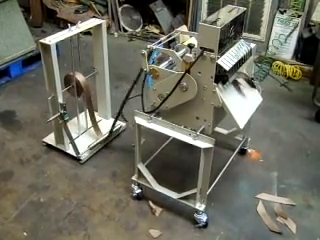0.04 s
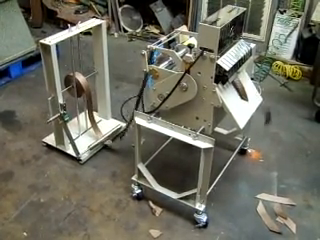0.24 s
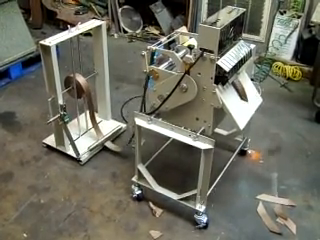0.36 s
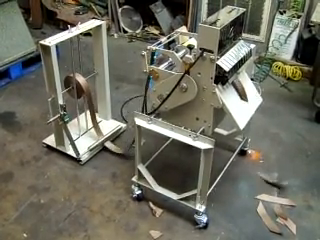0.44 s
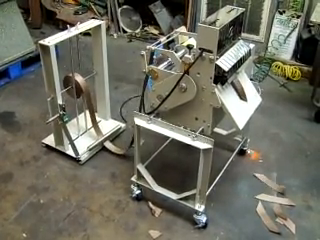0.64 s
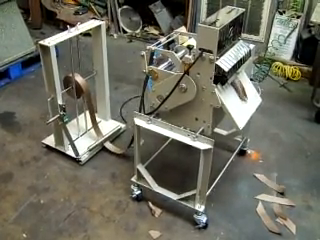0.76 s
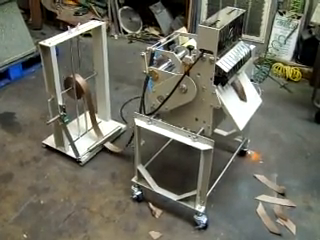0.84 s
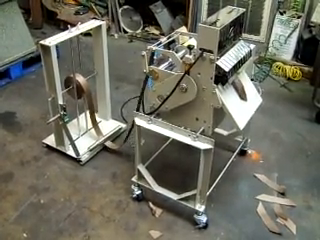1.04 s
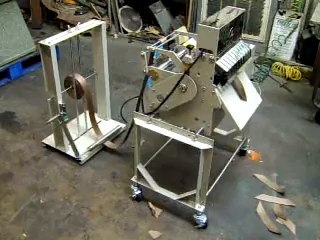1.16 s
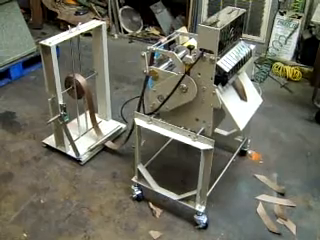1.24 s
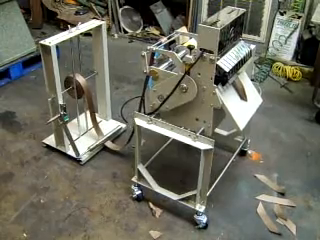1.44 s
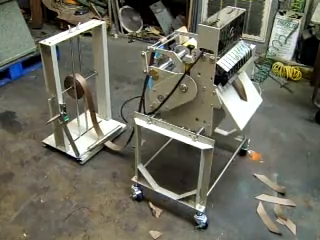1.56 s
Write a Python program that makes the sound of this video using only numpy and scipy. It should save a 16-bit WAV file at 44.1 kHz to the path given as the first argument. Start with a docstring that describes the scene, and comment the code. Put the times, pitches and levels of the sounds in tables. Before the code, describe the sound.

A cutting machine clacks sharply twice, with lighter metal knocks over a low motor hum.

```python
"""A strip cutter runs through one cycle in a workshop, heard on a single microphone.
A stepper motor whines and feeds the strip to its stop; the steel knife clacks down, rattles and rings,
and its carrier lifts with a clink. An air valve vents, the slide bangs back, and two lighter knocks
follow, with faint squeaks from dry bearings. The knife, slide and knocks leave a short tail in the room.
Motor hum and the thin whirr of running gear go on underneath."""
import sys
import numpy as np
from scipy import signal
from scipy.fft import rfft, irfft, next_fast_len
from scipy.io import wavfile
from scipy.ndimage import map_coordinates

SR = 44100
rng = np.random.default_rng(int(sys.argv[2]) if len(sys.argv) > 2 else 0)


def to_wav(sig):
    """Store sig (one row per channel, or 1-D mono) as 16-bit WAV at the path in sys.argv[1].

    Samples outside -1..1 are clipped; the rate is SR.
    """
    pcm = np.clip(np.atleast_2d(sig), -1, 1) * 32767
    pcm = np.round(pcm).astype(np.int16)
    wavfile.write(sys.argv[1], SR, pcm.T)  # frames by channels


N = 70560

# colour of the running gear and its loose parts: pitch_hz, level_db
GEAR_COLOUR = [(1500, -23.5), (2800, -13.5), (3300, -7), (3700, 1.5), (4050, -3.5), (4500, -13.5),
               (7000, -36)]


def amp(db):
    """Decibels to gain."""
    return 10 ** (np.asarray(db) / 20)


def clock():
    """Seconds at each sample."""
    return np.arange(N) / SR


def over_time(points):
    """(time_s, value) points read at each sample."""
    return np.interp(clock(), *np.transpose(points))


def over_pitch(points, hz):
    """(pitch_hz, value) points read on a log axis."""
    pitches, values = np.transpose(points)
    return np.interp(np.log(hz + 1), np.log(pitches + 1), values)


def fade(t, t60_s):
    """Exponential decay from t = 0."""
    return np.exp(-np.log(1000) * np.maximum(t, 0) / t60_s)


def rise(t, rise_s):
    """Soft onset at t = 0."""
    return 1 - np.exp(-np.maximum(t, 0) / rise_s)


def wobble(rate_hz):
    """A smooth random curve with rate_hz knots a second."""
    return map_coordinates(rng.standard_normal(1000), [clock() * rate_hz], mode="wrap")


def filtered(x, response):
    """x shaped by a gain that depends on frequency."""
    size = next_fast_len(N + SR // 2)
    return irfft(rfft(x, size) * response(np.fft.rfftfreq(size, 1 / SR)), size)[:N]


def noise(colour):
    """Coloured noise of rms 1."""
    x = filtered(rng.standard_normal(N), lambda hz: amp(over_pitch(colour, hz)))
    return x / np.sqrt(np.mean(x ** 2) + 1e-20)


def crowd(colour, ripple_db=4.5, spacing_hz=22.05):
    """A spectrum broken into the machine's many narrow resonances, each of random strength."""
    hz = np.arange(1, 1000) * spacing_hz
    return np.transpose([hz, over_pitch(colour, hz) + ripple_db * rng.standard_normal(len(hz))])


def tone(hz, db, drift_hz, flutter_db):
    """A sine wavering about the given pitch and rms level."""
    phase = 2 * np.pi * (np.cumsum(hz + drift_hz * wobble(24.99)) / SR + rng.random())
    return np.sqrt(2) * amp(db + flutter_db * wobble(21.95)) * np.sin(phase)


def in_room(x):
    """x dies away in the workshop, the treble first."""
    # reverberation: pitch_hz, t60_s
    room_decay = [(300, 0.93), (1200, 0.64), (3800, 0.57), (7000, 0.53), (14000, 0.32)]
    hz, t, spectra = signal.stft(x, SR, nperseg=256)
    decay = fade(t, over_pitch(room_decay, hz)[:, None])
    return signal.istft(spectra * decay, SR, nperseg=256)[1][:N]


def ring(hits, modes, attack_s, max_t60_s, blur):
    """Every blow adds energy to the decaying modes; reflections blur their level and phase."""
    t, out = clock(), np.zeros(N)
    for hz, db, t60_s in modes:
        energy = sum((amp(hit_db) * rise(t - s, attack_s) * fade(t - s, min(t60_s, max_t60_s))) ** 2
                     for s, hit_db in hits)
        scatter = 1 + blur * (wobble(46.97) + 1j * wobble(65.1))
        vibration = np.exp(2j * np.pi * (hz * t + rng.random()))
        out += amp(db) * np.sqrt(energy) * np.real(scatter * vibration)
    return out / np.sqrt(sum(amp(db) ** 2 for _, db, _ in modes) / 2)


def strike(hits, body, modes, attack_s, clack_t60_s, clack_db, room_db, ring_db,
           max_t60_s, blur, ripple_db):
    """Each blow gives a short clack of dense weak modes, a tail in the room and a ring of clear modes."""
    t, out = clock(), np.zeros(N)
    resonances = crowd(body, ripple_db)
    for start_s, db in hits:
        clack = amp(clack_db) * noise(body) * fade(t, clack_t60_s)
        tail = amp(room_db) * in_room(noise(resonances)) * rise(t, 0.009)
        blow = (clack + tail) * rise(t, attack_s)
        start = round(start_s * SR)
        out[start:] += amp(db) * blow[:N - start]
    return out + amp(ring_db) * ring(hits, modes, attack_s, max_t60_s, blur)


def workshop():
    """The bed of the place: motor hum, room tone and the uneven whirr and whistle of running gear."""
    # motor tones and the colour of the room tone: pitch_hz, level_db
    hum_tones = [(74, -68.5), (88, -70.5), (115, -64.5), (168, -73)]
    room_colour = [(25, -7), (42, -10.5), (85, -4), (130, -8), (230, -12), (600, -15), (1200, -11),
                   (1600, -7), (2300, -16), (3300, -5), (3900, -6), (5200, -14), (8800, -24), (15500, -30)]
    # swell of the running gear: time_s, level_db
    whirr_level = [(0, -50), (.5, -46.5), (1.05, -45), (1.3, -53), (1.55, -54), (1.6, -57)]
    whistle_level = [(0, -65), (1.1, -66), (1.3, -61), (1.6, -63)]
    hum = sum(tone(hz, db, drift_hz=4.17, flutter_db=2.5) for hz, db in hum_tones)
    whirr = noise(crowd(GEAR_COLOUR)) * amp(over_time(whirr_level) + 1.5 * wobble(59.6))
    whistle = tone(4680, over_time(whistle_level), drift_hz=1.6, flutter_db=1.5)
    return hum + amp(-55) * noise(room_colour) + whirr + whistle


def feed(step_hz=393.8, stop_s=0.207):
    """The stepper whines under load and the roller sings while the strip scrapes through."""
    # overtones of the step rate: multiple, level_db
    overtones = [(4, -42.5), (6, -59), (7, -63), (8, -58.5), (9, -57.5), (10, -54)]
    # the stepper's load as it pulls: time_s, gain_db
    load = [(0, -6.5), (.05, -3), (.1, 0.5), (.15, -4.5), (.2, -2)]
    # the roller's note: time_s, pitch_hz
    roller_pitch = [(0, 3990), (.07, 4005), (.12, 4055), (.18, 4070), (.22, 4020)]
    # colour of the scrape: pitch_hz, level_db
    scrape_colour = [(400, -22.5), (690, -7), (1050, -10), (1270, 1.5), (1850, -11), (2300, -8.5),
                     (3900, -9.5), (5500, -16), (12000, -38)]
    # swell of the scrape: time_s, level_db
    scrape_level = [(0, -55), (.05, -52.5), (.08, -46.5), (.15, -57.5), (.22, -49)]
    whine = sum(tone(multiple * step_hz, db + over_time(load), drift_hz=1.6, flutter_db=0.5)
                for multiple, db in overtones)
    roller = tone(over_time(roller_pitch), db=-49.5, drift_hz=6, flutter_db=3)
    scrape = noise(crowd(scrape_colour)) * amp(over_time(scrape_level))
    return (whine + roller + scrape) * fade(clock() - stop_s, t60_s=0.72)


def strip_stop():
    """The strip bumps softly against its stop."""
    # bumps: start_s, level_db
    hits = [(.2, -33), (0.267, -32.5), (0.308, -37)]
    # their colour: pitch_hz, level_db
    body = [(300, -40), (700, -15), (1150, -19.5), (1440, 1.5), (1750, -10.5), (2080, -4), (2700, -20),
            (3600, -3.5), (4200, -5), (5500, -29), (14000, -43)]
    t, resonances = clock(), crowd(body)
    return sum(amp(db) * noise(resonances) * rise(t - s, 0.0097) * fade(t - s, t60_s=0.41)
               for s, db in hits)


def knife(crack_rise_s=0.0006):
    """The knife lands with a crack of steel on steel and rattles, its thin edge ringing high."""
    # landing and rebounds: start_s, level_db
    hits = [(0.2486, -17.5), (.277, -24), (0.356, -34.5)]
    # clear modes of the blade and its edge: pitch_hz, level_db, t60_s
    blade_modes = [(1030, -24, .3), (1410, -19, .45), (2066, -23, .4), (2579, -10, .54), (2832, -17, .42),
                   (3058, -11, .55), (3182, -13, .42), (3278, -11, .42), (3542, -12, .5), (3580, -18, 1.4),
                   (3788, 2.5, .34), (3838, -1, .25), (3994, -10, .5), (4247, -8, .47), (4480, -10, .36),
                   (4867, -12, .24), (5028, -12, .32), (5830, -20, .3)]
    edge_modes = [(6681, -2, 0.058), (7020, 4, 0.34), (8620, 1, 0.13), (9460, -1.5, 0.18),
                  (10200, -4.5, 0.16)]
    # colours of the clack and the bright crack: pitch_hz, level_db
    body = [(200, -32.5), (400, -42.5), (620, -26), (1050, -29.5), (1450, -18), (1800, -23), (2900, -14),
            (3800, -1), (4900, -11), (5900, -14), (7600, -24), (10300, -28), (15500, -35)]
    crack_colour = [(1000, -38), (4000, 4), (9000, 7), (15500, -15)]
    out = strike(hits, body, blade_modes, attack_s=0.002, clack_t60_s=0.097, clack_db=2.5,
                 room_db=-8.5, ring_db=-1, max_t60_s=0.86, blur=0.15, ripple_db=5.5)
    out += amp(-18) * ring(hits, edge_modes, crack_rise_s, max_t60_s=0.15, blur=0.78)
    t = clock()
    for start_s, db in hits:
        crack = amp(-9) * noise(crack_colour) * rise(t, crack_rise_s) * fade(t, t60_s=0.022)
        out += amp(db) * np.pad(crack, (round(start_s * SR), 0))[:N]
    return out


def carrier():
    """The knife's carrier meets its upper stop with a light clink."""
    # contacts: start_s, level_db
    hits = [(0.5626, -36), (.568, -30)]
    # colour of the clink: pitch_hz, level_db
    body = [(500, -42), (1450, -22.5), (2900, -14.5), (3800, -1.5), (5000, -11), (7200, -21.5),
            (15500, -37.5)]
    # clear modes: pitch_hz, level_db, t60_s
    modes = [(2575, -15, .45), (3058, -10, .4), (3600, -5, .25), (3842, 1, .3), (4000, -7, .25),
             (4247, -5, .36), (4497, -6, .24), (5028, -10, .25), (5830, -13, .35)]
    return strike(hits, body, modes, attack_s=0.0013, clack_t60_s=0.071, clack_db=4,
                  room_db=-8, ring_db=-1.5, max_t60_s=0.5, blur=0.27, ripple_db=6)


def loose_parts():
    """Loose steel parts rattle in short, dry bursts."""
    # rattles: start_s, level_db
    hits = [(0.664, -42), (0.732, -31)]
    t, resonances = clock(), crowd(GEAR_COLOUR)
    return sum(amp(db) * noise(resonances) * rise(t - s, 0.0049) * fade(t - s, t60_s=0.14)
               for s, db in hits)


def bearings():
    """Dry bearings rub and sing briefly as the parts move."""
    # squeaks: start_s, end_s, pitch_hz, level_db
    squeaks = [(.671, .686, 4090, -39), (1.09, 1.125, 3605, -47), (1.41, 1.575, 3946, -54),
               (1.45, 1.58, 3381, -55)]
    t, out = clock(), np.zeros(N)
    for start_s, end_s, hz, db in squeaks:
        envelope = rise(t - start_s, 0.0056) * fade(t - end_s, t60_s=0.063)
        out += tone(hz, db, drift_hz=16.3, flutter_db=3.5) * envelope
    return out


def valve(start_s=0.7155):
    """The valve thumps over and air hisses out."""
    # colours of the thump and the escaping air: pitch_hz, level_db
    thump_colour = [(100, -11), (250, -5), (500, -3), (750, -6.5), (1200, -1), (2200, -11.5), (3800, 5.5),
                    (6000, -16), (12000, -29)]
    exhaust_colour = [(590, -54), (1000, -17.5), (1900, -27), (3450, -16), (3740, 0), (5520, -17),
                      (6340, -11.5), (8540, -26), (15500, -32)]
    t = clock() - start_s
    thump = amp(-31.5) * noise(thump_colour) * rise(t, 0.00037) * fade(t, t60_s=0.068)
    exhaust = amp(-36.5) * noise(exhaust_colour) * rise(t, 0.0064) * fade(t, t60_s=1)
    return thump + exhaust


def slide():
    """The slide bangs home and rings."""
    # bang and rebound: start_s, level_db
    hits = [(.8045, -16.5), (.828, -28)]
    # colour of the bang: pitch_hz, level_db
    body = [(150, -32), (260, -24.5), (480, -24), (750, -17), (1200, -12), (1750, -14), (2200, -11.5),
            (3100, -4.5), (3850, 1), (5400, -22), (6600, -18), (9300, -32.5), (15500, -37)]
    # clear modes: pitch_hz, level_db, t60_s
    modes = [(705, -18, .45), (794, -12, .16), (980, -6, .21), (1160, -5, .15), (1254, -3, .23),
             (2019, -10, .26), (2643, -3, .22), (2794, -7, .21), (3176, 3, .26), (3380, -5, .24),
             (3630, -2, .3), (3741, -7, .48), (3833, -2, .28), (3920, 2, .3), (4020, -3, .36),
             (4248, -4, .2), (6970, -18, .17)]
    return strike(hits, body, modes, attack_s=0.00094, clack_t60_s=0.18, clack_db=0,
                  room_db=-9, ring_db=-4, max_t60_s=0.62, blur=0.14, ripple_db=4.5)


def frame():
    """The frame takes a dull knock that dies quickly."""
    # contacts: start_s, level_db
    hits = [(1.1325, -30.5), (1.1365, -28.5)]
    # colour of the knock: pitch_hz, level_db
    body = [(250, -31), (705, -15), (823, -14.5), (1160, -6.5), (1360, -12.5), (1610, -6), (2060, -8),
            (3010, -5.5), (3390, 3), (7130, -30), (15500, -32.5)]
    # clear modes: pitch_hz, level_db, t60_s
    modes = [(700, -9, .2), (898, -8, .28), (1195, 0, .16), (1657, 1.5, .12), (2740, 1, .15),
             (3260, -1, .14), (3440, 1, .11), (3943, 4, .1)]
    return strike(hits, body, modes, attack_s=0.00049, clack_t60_s=0.073, clack_db=2.5,
                  room_db=-9.5, ring_db=-5, max_t60_s=0.36, blur=0.4, ripple_db=3)


def latch():
    """A latch drops with a light, ringing knock."""
    # contact: start_s, level_db
    hits = [(1.2145, -30)]
    # colour of the knock: pitch_hz, level_db
    body = [(350, -45), (950, -18), (1300, -30), (1650, -11.5), (2600, -8), (3200, 1), (3870, -3.5),
            (4620, -1.5), (5900, -23), (7200, -16.5), (9000, -30), (15500, -34)]
    # clear modes: pitch_hz, level_db, t60_s
    modes = [(1670, -14, .28), (3060, -10, .4), (3182, -5, .5), (3230, -5, .4), (3590, -4, .55),
             (4250, -1, .35), (4650, -3, .2), (4760, -1, .17), (7170, -7, .11)]
    return strike(hits, body, modes, attack_s=0.0029, clack_t60_s=0.092, clack_db=4,
                  room_db=-7.5, ring_db=-3.5, max_t60_s=0.42, blur=0.57, ripple_db=3.5)


def scene():
    """The cutter and the workshop around it, at one microphone."""
    contacts = knife() + carrier() + slide() + frame() + latch() + strip_stop() + loose_parts()
    return (contacts + feed() + bearings() + valve() + workshop())[None]


def record(dry):
    """The microphone's channel passes nothing above 15.8 kHz."""
    return filtered(dry[0], lambda hz: hz < 15800)[None]


dry = scene()
out = record(dry)
to_wav(out)
```